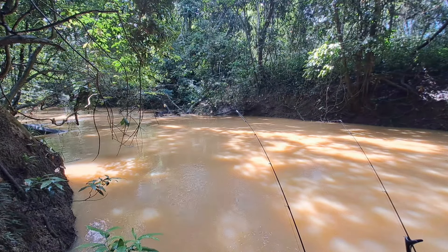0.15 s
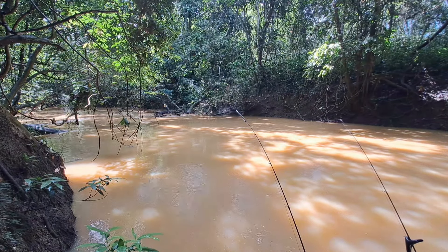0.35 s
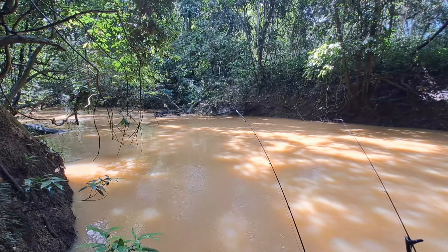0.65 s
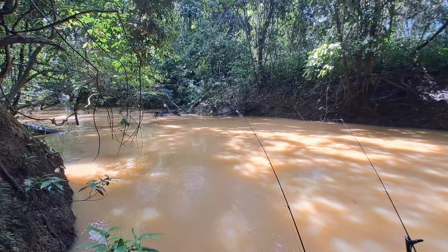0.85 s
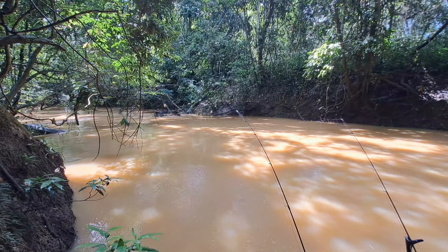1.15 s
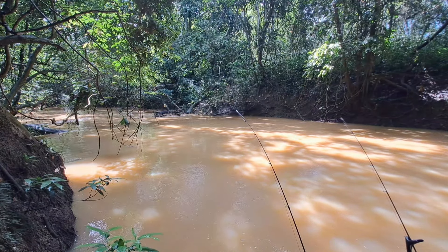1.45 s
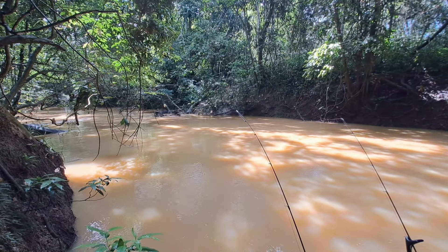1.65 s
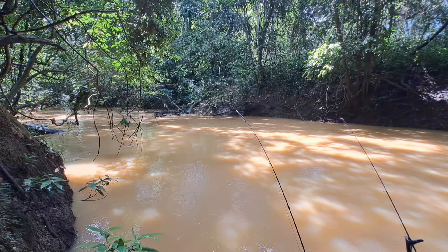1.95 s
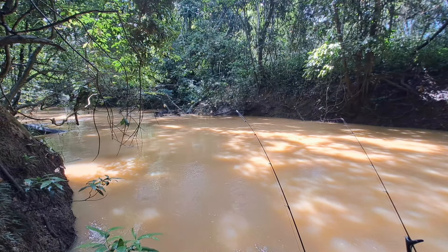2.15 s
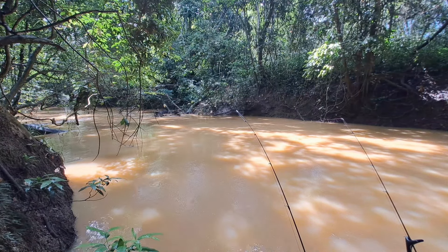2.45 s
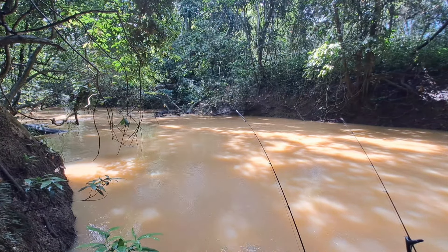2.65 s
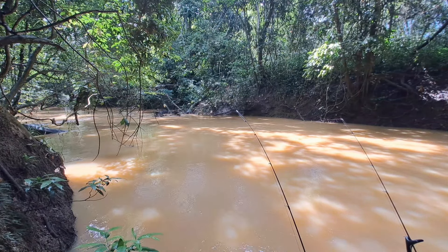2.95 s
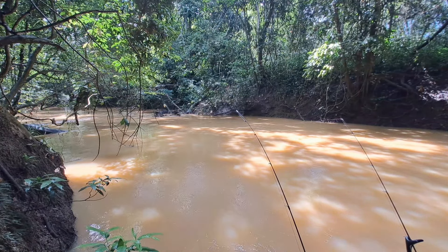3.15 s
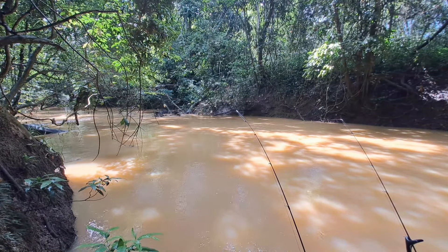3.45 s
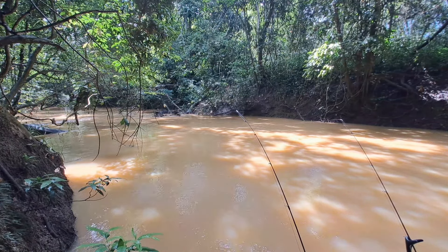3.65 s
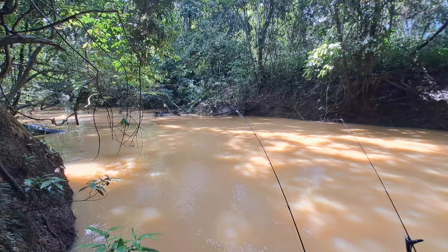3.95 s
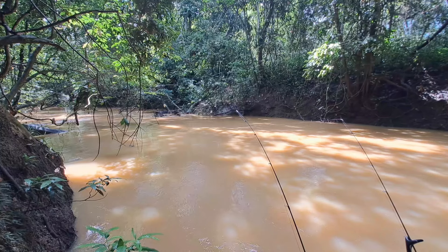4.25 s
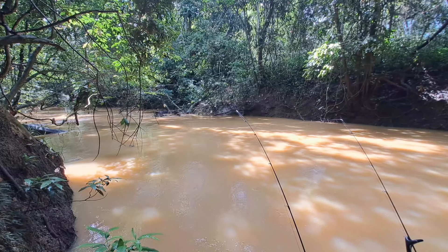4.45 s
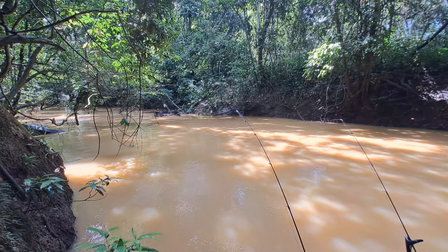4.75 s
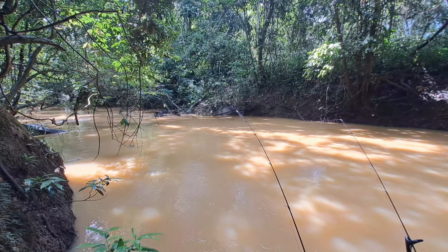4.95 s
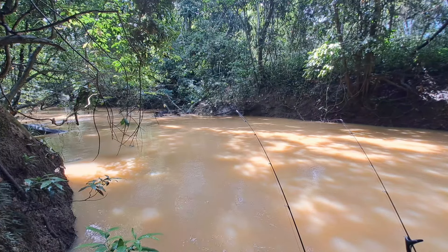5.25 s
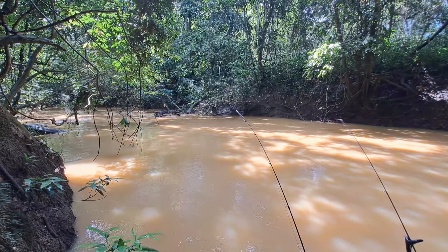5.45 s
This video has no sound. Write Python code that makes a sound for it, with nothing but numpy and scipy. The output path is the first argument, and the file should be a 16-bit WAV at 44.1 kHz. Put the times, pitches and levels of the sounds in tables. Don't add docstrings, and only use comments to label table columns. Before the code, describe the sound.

On a wooded riverbank, one near insect holds a high, almost pure whistle pulsing about eleven times a second, stronger on the right. Distant cicadas hiss in wide stereo above and around it, with faint water laps low on the left. After three and a half seconds, handled tackle squeaks, knocks hollowly, rustles and snaps close to the microphone, then knocks softly again near the end.

```python
import sys
import numpy as np
from scipy import signal
from scipy.fft import rfft, irfft, next_fast_len
from scipy.io import wavfile
from scipy.ndimage import uniform_filter1d

SR = 44100
rng = np.random.default_rng(int(sys.argv[2]) if len(sys.argv) > 2 else 0)


def gain_from_db(level_db):
    decades = np.asarray(level_db, float) / 20
    return 10 ** decades


def unload_audio(sound):
    columns = np.transpose(np.atleast_2d(sound))
    steps = np.round(np.clip(columns, -1, 1) * 32767)
    wavfile.write(sys.argv[1], SR, steps.astype(np.int16))


N = 246519
T = np.arange(N) / SR

# time [s], middle pitch [Hz], swings a second [Hz], effort [dB].
SONG = [(-0.012, 5774.67, 11.324, 0.5), (0.471, 5781.4, 11.276, 0.9), (0.757, 5785.09, 11.163, 0.1),
        (1.181, 5790.7, 11.279, 0.1), (1.186, 5789.49, 11.266, -0.2), (1.839, 5798.06, 11.255, 0.0),
        (2.064, 5795.72, 11.165, 0.5), (2.161, 5801.3, 11.214, -0.5), (2.783, 5803.74, 11.088, -0.0),
        (2.783, 5806.68, 11.272, 0.9), (3.076, 5803.9, 11.353, 1.8), (3.147, 5810.17, 11.6, 0.2),
        (3.304, 5805.67, 11.527, -0.3), (4.064, 5800.69, 11.092, -1.1), (4.57, 5803.03, 11.199, -1.4),
        (4.603, 5806.38, 11.131, -1.9), (4.672, 5804.97, 11.115, -0.4), (5.59, 5810.26, 11.219, 0.8)]
# delay [ms], level [dB].
PATHS_LEFT = [(8.172, -6.8), (32.009, -9.0), (40.143, -9.2), (64.014, -14.9), (72.042, -12.2),
              (82.163, -12.5), (102.057, -9.4), (130.083, -19.4), (136.077, -13.5), (158.034, -23.5),
              (186.026, -17.2), (200.09, -19.2)]
PATHS_RIGHT = [(6.022, -14.8), (16.058, -3.8), (34.158, -11.0), (56.125, -10.9), (82.127, -16.7),
               (102.046, -18.7), (122.171, -15.7), (132.131, -20.2), (144.154, -20.8), (164.032, -19.3),
               (192.121, -19.3), (218.035, -17.6)]
# delay [ms], level [dB].
UNDER_LEFT = [(10.08, -6.3), (36.151, -8.7), (62.076, -12.5), (74.085, -9.3), (98.08, -16.4),
              (130.069, -17.3)]
UNDER_RIGHT = [(10.186, -7.5), (28.01, -5.0), (48.015, -13.4), (70.001, -10.5), (102.098, -12.6),
               (108.054, -11.2)]
# left [dB], right [dB].
WHISTLE_DB = [-35.5, -26]
UNDER_DB = [-64.5, -60]
LEAD_S = 0.25

# start [s], peak [dB], pitch [Hz], brightness [dB].
KNOCKS = [(3.76, -43, 583, -19), (3.766, -16, 589, -5.5), (3.784, -30, 506, -14), (3.799, -29.5, 513, -3),
          (3.825, -28, 620, -11), (3.923, -54, 493, 18), (4.041, -52, 633, 9), (4.117, -28.5, 645, -7.5),
          (4.277, -44, 593, 6), (4.307, -33.5, 850, -18), (4.316, -39, 524, -12), (4.384, -34.5, 573, -8),
          (4.397, -23.5, 640, -11.5), (4.436, -50, 541, -9), (4.454, -33, 566, 1), (4.464, -49, 300, -15),
          (4.48, -48, 320, 20), (4.547, -48, 623, 2), (4.587, -37, 970, -1), (4.601, -48.5, 300, -6),
          (5.139, -53, 520, -20), (5.209, -34, 580, -33), (5.224, -41.5, 644, -30), (5.242, -29, 590, -27),
          (5.258, -34, 590, -35), (5.273, -37, 660, -18), (5.29, -44.5, 650, -14)]
# start [s], peak [dB].
TICKS = [(0.557, -35), (3.764, -29), (3.9215, -31), (3.9526, -42), (3.9599, -31), (3.9834, -31),
         (4.138, -37), (4.2076, -32), (4.4802, -44), (4.6663, -55), (5.3014, -38)]
# middle [s], length [s], centre [Hz], width [Hz], level [dB].
RUSTLE = [(0.116, 0.076, 270, 260, -64.5), (0.497, 0.26, 3860, 670, -59.5), (0.73, 0.96, 4500, 1100, -61.5),
          (0.92, 0.77, 2760, 400, -61), (0.68, 0.31, 255, 140, -68), (4.15, 0.32, 170, 110, -66),
          (1.2, 0.27, 276, 170, -71.5), (0.92, 1, 385, 300, -68.5), (4.134, 0.54, 2050, 1550, -56),
          (0.96, 0.58, 760, 460, -66), (3.2, 0.12, 4400, 700, -59), (3.653, 0.35, 4300, 1700, -57),
          (3.87, 0.13, 2300, 2100, -57.5), (4.75, 0.7, 4030, 1900, -54.5), (3.801, 0.094, 2800, 5000, -45),
          (3.965, 0.18, 2730, 1180, -50.5), (4.078, 0.99, 650, 590, -61.5), (4.306, 0.14, 810, 710, -53),
          (4.313, 0.067, 2170, 1500, -49.5), (4.46, 0.5, 3070, 2900, -52.5), (4.444, 0.27, 670, 800, -57.5),
          (4.613, 0.46, 1640, 2380, -55.5), (5.32, 1, 3940, 1500, -58.5), (5.26, 0.52, 660, 640, -63),
          (5.446, 0.52, 1450, 1680, -61)]
# start [s], peak [dB], pitch [Hz].
LAPS = [(0.089, -49.5, 1630), (0.128, -53, 1620), (0.19, -50.5, 1580), (0.488, -59, 555),
        (0.579, -48, 1253), (0.63, -50, 1490), (0.679, -52, 1390), (0.836, -62, 445), (0.92, -63, 563),
        (1.053, -63, 751), (1.128, -57, 1440), (1.194, -64, 950), (1.245, -61.5, 700), (1.499, -50, 1620),
        (1.534, -51.5, 1750), (1.59, -55.5, 1520), (1.636, -59, 1410), (1.97, -55.5, 1540),
        (2.009, -68, 1360), (2.271, -57.5, 1110), (2.308, -57.5, 1270), (2.422, -61, 1570),
        (2.465, -59, 1480), (2.55, -61, 1790), (2.754, -68, 524), (2.949, -56, 2030), (.225, -59, 847),
        (2.335, -63, 560), (3.49, -62, 604), (4.879, -56.5, 1520)]

# frequency [Hz], right level [dB per Hz], left minus right [dB].
LOW_CHOIR = [(2620, -112, -23), (3080, -87.5, 6), (3300, -78, -1), (3650, -85.5, -2), (3570, -100, 1),
             (4300, -115, -21)]
MAIN_CHOIR = [(5130, -106, 6), (5345, -88, 3), (5680, -77, 1.5), (6110, -62, -3), (6920, -67.5, -7.5),
              (6840, -61.5, -7), (7765, -67.5, -4), (8320, -73, -21), (8530, -81.5, -3), (9300, -79, -14),
              (10560, -86.5, -9), (12100, -92.5, -1)]
HIGH_CHOIR = [(10200, -100, -9), (11550, -77, -7), (12370, -66, -15.5), (12775, -69.5, 4),
              (12950, -61, 1.5), (12930, -65.5, -10), (13690, -70.5, -5.5), (14600, -91, 0),
              (14700, -83.5, -20), (15800, -85, -6)]
# time [s], level [dB], left minus right [dB], wave depth [dB].
HIGH_SWELL = [
    (0, -3, -3.5, 3.5),
    (1.2, -2.5, -2.5, -0.5),
    (2.4, -1, -0.5, 0),
    (3, -0.5, 0.5, -0.5),
    (4, 0.5, 0, 0.5),
    (4.7, 0.5, -1.5, 0.5),
    (5.3, 2, -1, 1),
    (5.59, 2, 1.5, -3),
]
# centre [Hz], width [Hz], right level [dB], left minus right [dB],
# throbs a second [Hz], throb depth [0-1].
SINGERS = [
    (8976, 270, -44.5, -26, 45, 0.11),
    (6130, 46, -70.5, -6, 12, 0),
    (5380, 41, -57.5, -7, 19, .25),
]
# frequency [Hz], right level [dB per Hz], left minus right [dB].
AIR = [(20, -104, -7), (67, -89.5, 0), (130, -93.5, -2.5), (300, -100, 1.5), (990, -102, 2),
       (2600, -103, -1.5), (4400, -95.5, -2.5), (5160, -101, 1), (9000, -100, -5), (15400, -100, 0)]


def whistler():
    t = np.arange(-int(LEAD_S * SR), N) / SR
    s, *columns = np.transpose(SONG)
    hz, rate, effort_db = (np.interp(t, s, column) for column in columns)
    swing = 2 * np.pi * np.cumsum(rate) / SR
    swing += 2 * np.pi * -0.081 - swing[-N]
    phase = 2 * np.pi * np.cumsum(hz) / SR
    phase += 1.762 * np.sin(swing) + 0.227 * np.sin(2 * swing - 1.564)
    pump = 1 + 0.161 * np.cos(swing + 1.595)
    tone = gain_from_db(effort_db) * pump * np.cos(phase)
    under = np.cos(4 / 5 * phase)
    leaves_db = -16
    ears = []
    for paths, low_paths, db, low_db in zip((PATHS_LEFT, PATHS_RIGHT), (UNDER_LEFT, UNDER_RIGHT),
                                            WHISTLE_DB, UNDER_DB):
        leaves = walk(25) * np.sin(phase[-N:]) + walk(25) * np.cos(phase[-N:])
        whistle = arrive(tone, paths) + gain_from_db(leaves_db) * unit(leaves)
        ears.append(gain_from_db(db) * whistle + gain_from_db(low_db) * arrive(under, low_paths))
    return np.array(ears)


def tackle():
    box, grit = np.zeros((2, N))
    knocks(box)
    snap(box, grit)
    squeak(box)
    ticks(grit)
    wash = rustle(box)
    return ports(box, -3.8, 0.28) + wash + grit * gain_from_db(np.array([[-14], [3]]))


def knocks(out):
    for s, db, hz, bright_db in KNOCKS:
        dull_db = min(bright_db, 0)
        add(out, s, ring(hz, 0.015, 0.0033), db)
        add(out, s, ring(hz * 1.81, 0.016, 0.0029), db - 2 + 0.4 * dull_db)
        add(out, s + 0.002, burst(0.0034, hz * 0.471, 150), db - 17.5)
        add(out, s, burst(0.0034, 1700, 1400), db - 1 + 0.68 * dull_db)
        add(out, s + 0.00395, burst(0.011, 730, 640), db - 6.5)
        add(out, s, burst(0.0031, 3100, 1170), db + bright_db - 2.5)


def snap(out, grit):
    snap_s, snap_db = 4.4475, -12.5
    add(out, snap_s + 0.0004, ring(2700, 0.005, 0.0002), snap_db)
    add(out, snap_s + 0.00104, burst(0.0058, 2300, 2800), snap_db - 9)
    click = np.eye(1, 200)[0]
    for late_s, crack_db in ((0.0004, 3), (0.00075, 2)):
        add(grit, snap_s + late_s, band(click, 7600, 7600, order=2), snap_db + crack_db)


def squeak(out):
    squeak_s, squeak_db = 3.545, -44.5
    add(out, squeak_s, ring(4300, 0.049, 0.002, -0.14), squeak_db)
    add(out, squeak_s, burst(0.012, 3660, 900), squeak_db + 3)


def ticks(grit):
    for s, db in TICKS:
        add(grit, s, burst(0.0012, 9700, 3000), db + 3.5)
        add(grit, s + 0.002, burst(0.007, 10300, 2600), db - 2.5)


def rustle(out):
    wash = np.zeros((2, N))
    rub = rng.standard_normal((3, N))
    rough = gain_from_db(3 * walk(60))
    for s, length, hz, width, db in RUSTLE:
        near = np.abs(T - s) < length / 2
        swell = gain_from_db(db) * np.cos(np.pi * (T[near] - s) / length) ** 2
        out[near] += swell * unit(band(rub[0, near] * rough[near], hz, width, order=2))
        wash[:, near] += 1.03 * swell * unit(band(rub[1:, near], hz, width, order=2))
    return wash


def water():
    out = np.zeros(N)
    for s, db, hz in LAPS:
        add(out, s, burst(0.072, hz, 0.5 * hz), db - 0.5)
        add(out, s, ring(0.93 * hz, 0.04, 0.0054, 0.14), db - 4.5)
        for late, pitch, size in rng.standard_normal((6, 3)):
            bubble = ring(hz * (1 + 0.07 * pitch), 0.022, 0.0017, 0.045)
            add(out, s + 0.016 * abs(late), bubble, db - 4.5 + 2.5 * size)
    return ports(out, 2.8, 0.18)


def choirs():
    swell_db, pan_db, wave_db = curve(HIGH_SWELL)
    wave = np.cos(2 * np.pi * (T - 0.34) / 0.51)
    wave_db = wave_db * wave * np.array([[1], [0.3]])
    high_db = swell_db + wave_db + np.array([pan_db, -pan_db]) / 2
    low = coloured(swarm(9000, 1.0, 0.48), LOW_CHOIR)
    main = coloured(swarm(14000, 0.47, 0.21), MAIN_CHOIR)
    high = coloured(swarm(14000, 0.97, 0.93), HIGH_CHOIR) * gain_from_db(high_db)
    return low + main + high


def swarm(clicks, spread_db, flicker_db):
    struck = rng.random((2, N)) < clicks / SR
    strength = rng.standard_normal((2, N)) * gain_from_db(spread_db * rng.exponential(size=(2, N)))
    return struck * strength * gain_from_db(flicker_db * np.array([walk(14), walk(15)]))


def lone_singers():
    out = np.zeros((2, N))
    for hz, width, db, side_db, rate, depth in SINGERS:
        throb = 1 + depth * np.sin(2 * np.pi * rate * T + walk(8.6))
        voice = unit(band(rng.standard_normal((2, N)), hz, width, order=2))
        out += voice * throb * gain_from_db(np.array([[db + side_db], [db]]))
    return out


def open_air():
    hush = rng.standard_normal((2, N)) + 0.53 * rng.standard_normal(N)
    return coloured(hush, AIR) * gain_from_db(0.09 * walk(3.9))


def arrive(x, paths):
    size = next_fast_len(len(x))
    echoes = sum(gain_from_db(db) * np.exp(delay_turn(size) * ms) for ms, db in paths)
    return unit(irfft(rfft(x, size) * echoes, size)[len(x) - N:len(x)])


def ports(x, pan_db, lag_ms):
    size = next_fast_len(N)
    turn = delay_turn(size)
    left = np.exp(turn * lag_ms) + 0.45 * np.exp(turn * (lag_ms + 0.32))
    late = irfft(rfft(x, size) * left, size)[:N]
    return np.array([late * gain_from_db(pan_db / 2), x * gain_from_db(-pan_db / 2)])


def delay_turn(size):
    return -2j * np.pi * np.arange(size // 2 + 1) * SR / size / 1000


def ring(hz, t60, rise=0., glide=0.):
    t = np.arange(int(1.5 * t60 * SR) + 8) / SR
    swell = 1 - np.exp(-t / (rise + 1e-6))
    decay = np.exp(-np.log(1000) * t / t60)
    return np.sin(2 * np.pi * hz * (t + glide * t ** 2 / t60)) * swell * decay


def burst(s, hz, width):
    t = np.arange(int(7 * s * SR) + 60) / SR
    return band(rng.standard_normal(len(t)) * np.exp(-t / s), hz, width, order=2)


def add(out, s, sound, db):
    i = int(s * SR)
    sound = sound[:N - i]
    out[i:i + len(sound)] += sound * gain_from_db(db) / np.abs(sound).max()


def band(x, hz, width, order=1):
    edges = [hz - width / 2, hz + width / 2]
    return signal.sosfilt(signal.butter(order, edges, "band", fs=SR, output="sos"), x)


def coloured(x, table):
    hz, db, pan_db = np.transpose(table)
    size = next_fast_len(N)
    f = np.log(np.arange(size // 2 + 1) * SR / size + 1)
    gain = [gain_from_db(np.interp(f, np.log(hz), ear_db, -200, -200)) for ear_db in (db + pan_db, db)]
    return irfft(rfft(unit(x), size) * gain, size)[:, :N] * np.sqrt(SR / 2)


def walk(rate):
    k = int(SR / rate)
    held = np.repeat(rng.standard_normal(N // k + 1), k)
    return 1.24 * uniform_filter1d(uniform_filter1d(held, k), k)[:N]


def curve(table):
    s, *columns = np.transpose(table)
    return [np.interp(T, s, column) for column in columns]


def unit(x):
    return x / np.sqrt(np.mean(np.square(x), axis=-1, keepdims=True))


def scene():
    return whistler() + tackle() + water() + choirs() + lone_singers() + open_air()


def top_cut(x):
    return signal.sosfilt(signal.butter(12, 15660, fs=SR, output="sos"), x)


def record(dry):
    low_pass = signal.ellip(8, 0.2, 70, 15650, fs=SR, output="sos")
    mix = signal.sosfilt(low_pass, dry)
    return top_cut(mix)


dry = scene()
out = record(dry)
unload_audio(out)
```